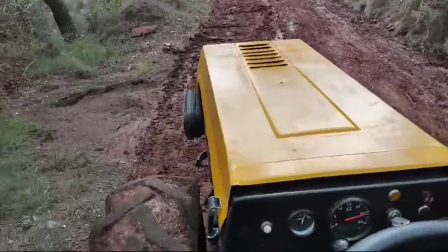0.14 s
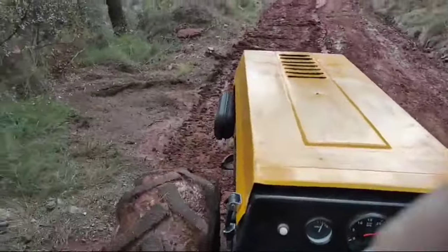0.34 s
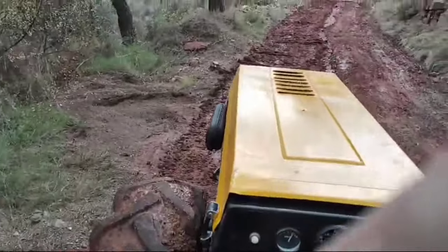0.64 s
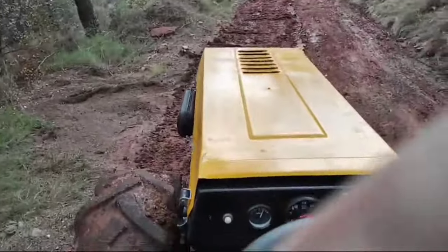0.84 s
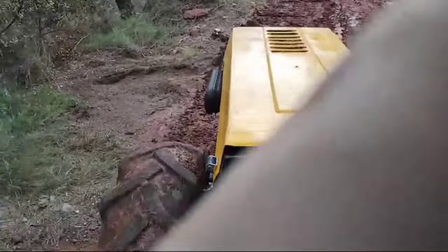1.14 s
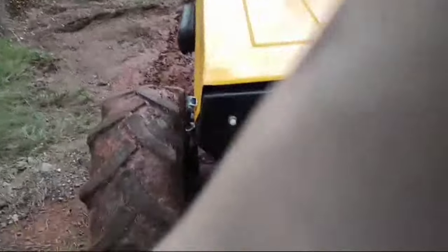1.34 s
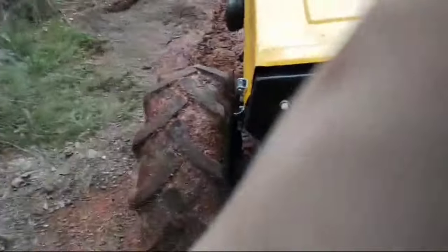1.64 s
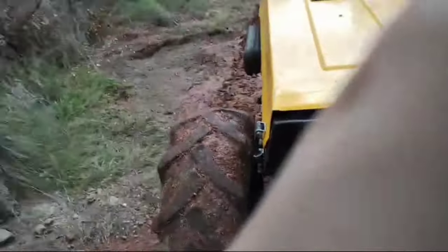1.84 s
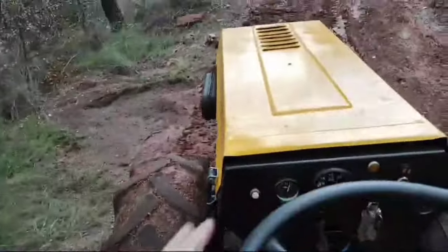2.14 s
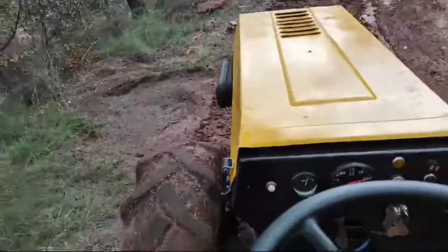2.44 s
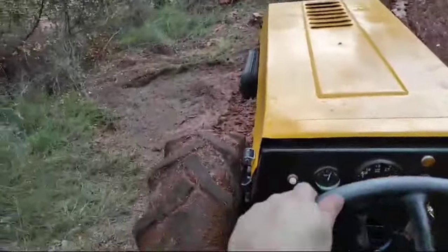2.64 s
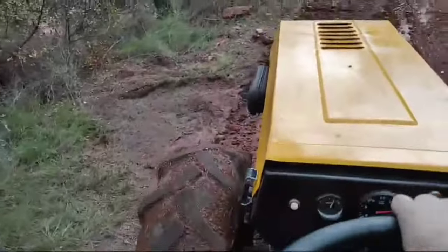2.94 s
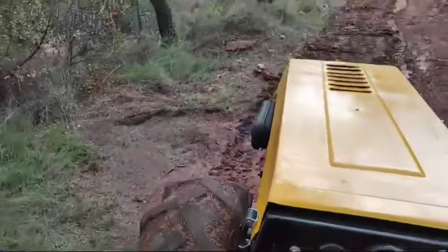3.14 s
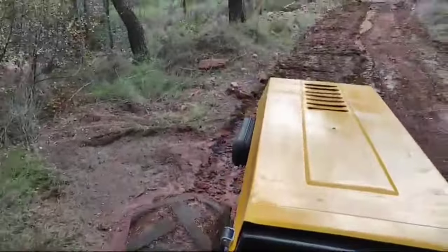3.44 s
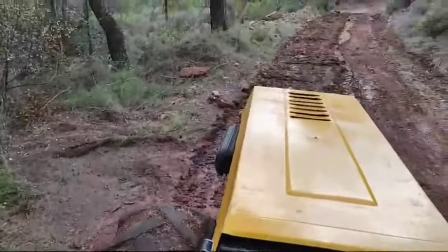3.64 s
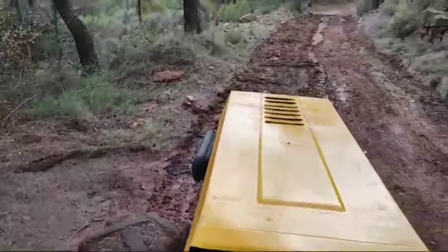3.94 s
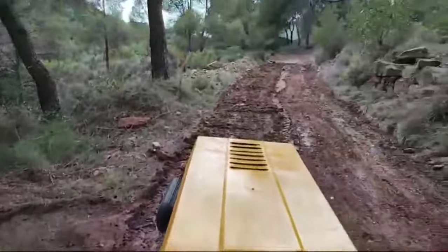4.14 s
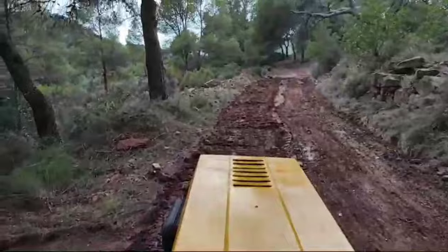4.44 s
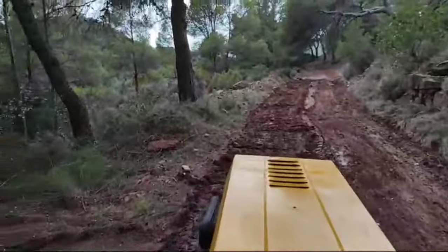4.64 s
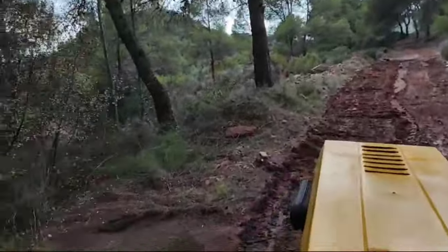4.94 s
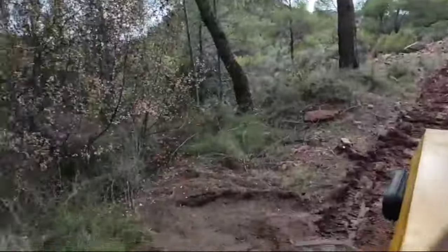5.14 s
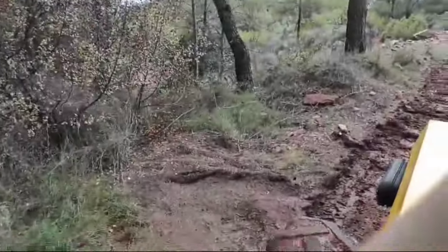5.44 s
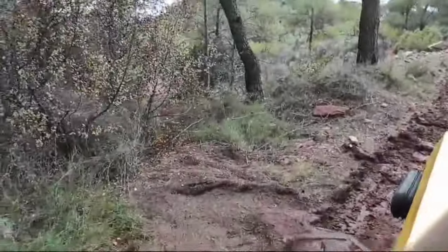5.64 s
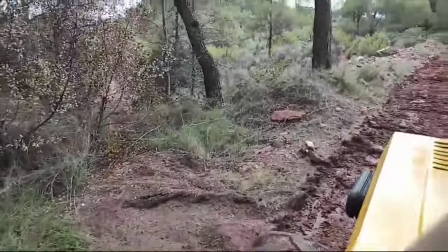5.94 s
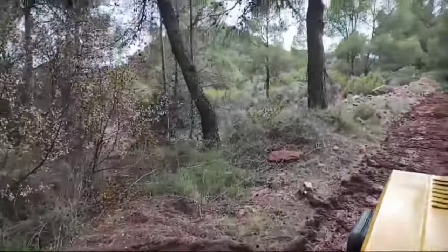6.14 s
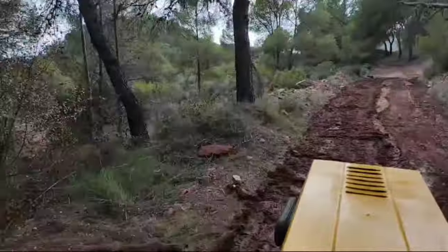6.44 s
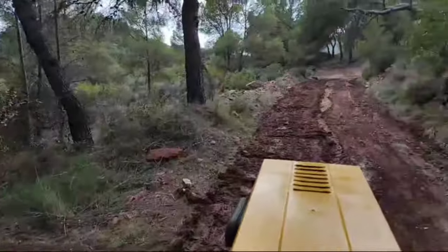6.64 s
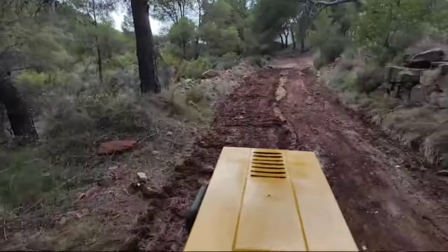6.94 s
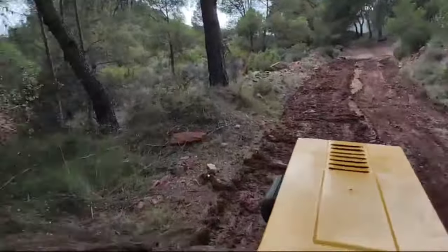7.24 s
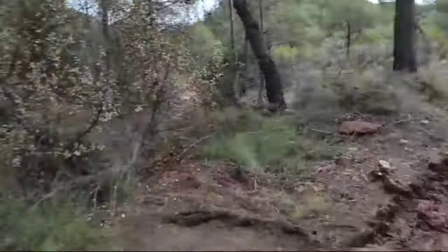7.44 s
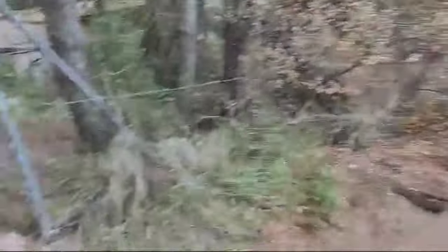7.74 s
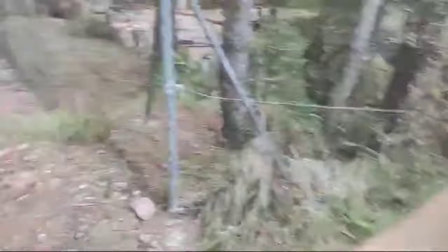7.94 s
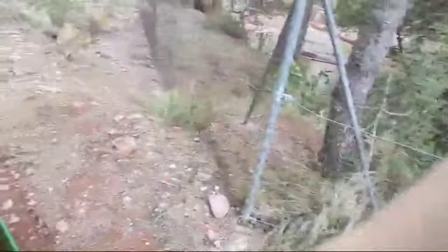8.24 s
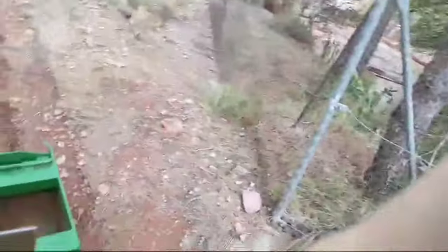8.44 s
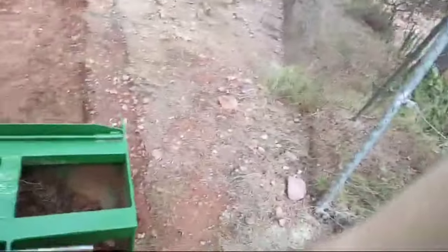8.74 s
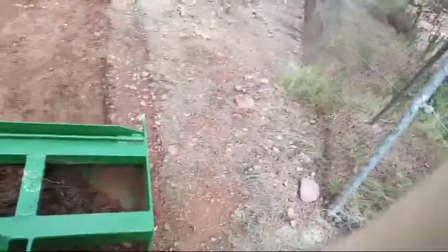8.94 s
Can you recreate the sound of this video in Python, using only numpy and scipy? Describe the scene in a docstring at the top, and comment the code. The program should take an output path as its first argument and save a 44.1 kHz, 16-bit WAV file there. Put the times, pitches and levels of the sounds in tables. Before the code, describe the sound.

Heard from the seat, a diesel tractor engine chugs and clatters at constant speed while loose panels buzz and the bodywork booms over ruts.

```python
"""A small diesel tractor pulls an implement along a dirt track at governed speed, heard from the seat.
From the start the chassis rumbles and booms over ruts, and each engine cycle repeats the same exhaust
puffs, frame throb, knocks in block and bonnet, and bright valve clatter. From 1.5 s the handheld
microphone faces the open engine bay and the clatter grows; loose sheets buzz in turn. Near 5.7 s it
glances left and comes back; from 7.4 s it swings to the rear while the engine speed sags a little."""
import sys
import numpy as np
from scipy import signal
from scipy.fft import rfft, irfft, next_fast_len
from scipy.io import wavfile
from scipy.ndimage import uniform_filter1d, minimum_filter1d

SR = 44100
rng = np.random.default_rng(int(sys.argv[2]) if len(sys.argv) > 2 else 0)


def generate_wav(sig):
    """Save sig (samples, or channels by samples) to the path in sys.argv[1] as 16-bit PCM at SR."""
    pcm = np.round(np.clip(np.atleast_2d(sig).T, -1, 1) * 32767).astype(np.int16)
    wavfile.write(sys.argv[1], SR, pcm)


N = 400869
FFT_SIZE = next_fast_len(N, True)
TIME_S = np.arange(N) / SR
FREQ_HZ = np.maximum(np.fft.rfftfreq(FFT_SIZE, 1 / SR), 1)
WANDER_S = .00016  # slow timing stray of knocks

# microphone aim: (time [s], angle from ahead [deg])
HEADING = [(5.0, 30), (5.7, 42), (6.5, 2), (7.35, 4), (7.75, 87), (8.05, 117), (8.5, 157), (9.09, 158)]
# exposure to the engine bay: (time [s], openness [0-1])
OPEN_BAY = [(1.45, 0.15), (1.6, 0.34), (1.72, 0.64), (2.4, 0.8), (5.0, 1), (5.72, 0.97), (5.88, 0.7)]
# by layer: (base [dB], drift [dB/s], bay open [dB], side on [dB], rear [dB])
AIM_LEVELS = dict(exhaust=(-14.5, 0.3238, -3, 1.1, -6), clatter=(-24.5, -0.61, 5.5, -1.5, 1),
              hiss=(-28, -0.19, 1, 1, 2.5), sizzle=(-28.5, 0.04, 4.5, 3.5, -1.2))
# left minus right by layer, same columns
AIM_PANS = dict(exhaust=(5, 0.57, -5, 0.5, 2.5), clatter=(-2.5, -0.78, 8, 0, 1),
            sizzle=(-12, 1, 7.5, 12.5, -2))
# chassis level, same columns
AIM_RUMBLE = (-21, -.03, -2, -1.5, -4)
# microphone ports: (frequency [Hz], left minus right [dB])
PORT_BALANCE = [(60, 6.5), (200, 4.2), (400, 3), (620, 2.1), (850, 5.8), (1100, 7.3), (2400, 6), (3600, 1),
                (5200, -.5), (6700, -3), (9000, 1.4)]
# microphone ports: (frequency [Hz], coherence [0-1])
PORT_COHERENCE = [(150, 1), (300, 0.93), (500, 0.79), (800, 0.6), (1400, .15), (2500, .01)]
# chassis: (frequency [Hz], relative level [dB])
RUMBLE_SPECTRUM = [(20, -28), (60, -16), (110, -15), (160, -9), (230, -4), (320, 0), (425, 0), (470, -8),
                   (530, -15), (800, -60)]
# wheel drops: (peak time [s], level [dB])
RUTS = [(.053, -20), (.334, -15), (.4, -20), (.533, -15), (.61, -19), (.878, -13), (.98, -22), (1.749, -21),
        (1.91, -19), (2.093, -20), (2.407, -16), (2.674, -18), (3.54, -20), (3.645, -18), (4.069, -21),
        (6.7, -22), (6.816, -20), (7.05, -22), (7.56, -23)]
# governed crankshaft: (time [s], speed [rpm])
CRANK_SPEED = [(0, 1783.5), (1.2, 1775.1), (3.6, 1772.1), (5.5, 1781), (7, 1775.4), (9.09, 1755.2)]
# gear and casing tones: (cycle harmonic, centre [s], half length [s], level [dB])
GEAR_TONES = [(40, 6.2, 2.4, -34), (48, 3.8, 1.5, -37), (58, 1.6, 2, -34.5), (72, 6, 1.6, -37),
              (88, 8.2, .4, -34)]
# loose sheets: (centre [s], half length [s], frequency [Hz], width [Hz], level [dB],
# phase [cycles], pulsing depth [dB])
LOOSE_SHEETS = [(0.106, 0.51, 780, 220, -23, 0.85, 1), (1.397, 0.48, 419, 60, -24, 0, 3),
                (1.4, 1.4, 944, 130, -32.5, 0.85, 3.5), (2.8, .55, 362, 100, -29.5, 0.2, 1),
                (4.25, 0.93, 623, 110, -25.5, 0.4, 3), (3.887, 1, 1143, 129, -30, .8, 0),
                (6.8, 1.03, 1037, 170, -27.5, 0.72, -3), (8.287, 0.29, 411, 49.2, -27.5, 0.6, -0.5),
                (8.5, 0.76, 834, 89.9, -30.5, 0.8, 1), (8.6, 1.2, 588, 272, -25.5, 0.5, 2)]
# bonnet sheets: (centre [s], half length [s], frequency [Hz], width [Hz], level [dB], phase [cycles])
STRUCK_SHEETS = [(1.5, 1.2, 843, 100, -31.5, .81), (6.695, 0.59, 1050, 120, -30.5, 0.69)]
# valve gear and injection: (phase [cycles], decay [cycles], relative level [dB])
BLOWS = [(.01, 0.17, -28), (.44, 0.057, 6), (.52, 0.23, 6.5), (.69, 0.25, 6.5), (.815, 0.08, -8),
         (.91, 0.49, 8)]
# sizzle: (frequency [Hz], relative left [dB], relative right [dB])
SIZZLE_SPECTRUM = [(5200, -24, -18), (6400, -22, -13.5), (7280, -1, 0), (7970, 0.5, -3.5), (8340, 7, -8),
                   (9190, 1, -10), (9570, -6.5, -30), (10370, -23.5, -45), (10730, -16.5, -33),
                   (12600, -30, -33.5)]
# sizzle flares and dips: (centre [s], half length [s], gain [dB])
SIZZLE_SWELLS = [(1.35, 0.12, -3.5), (2.536, 0.019, 5), (2.685, 0.028, 3), (5.396, 0.42, -3)]
# valve clatter: (frequency [Hz], relative level [dB])
CLATTER_SPECTRUM = [(700, -3.5), (1200, 5), (1450, -0.5), (1600, -1), (1900, -1), (2600, -5), (3300, -12),
                    (4500, -74)]
# hiss: (frequency [Hz], relative level [dB])
HISS_SPECTRUM = [(2500, -0.5), (3500, -1), (4200, -2.5), (4700, 1), (5300, -1), (6500, 1), (9000, -2.5),
                 (10200, -55), (12000, -23), (15500, -31)]
# bonnet and block modes: (frequency [Hz], width [Hz], level [dB], drift [dB/s], rear [dB])
PANEL_MODES = [(610, 240, -30, 0.36, -2), (844, 144, -26, -0.89, 3), (1030, 320, -29, 0, -6.5),
               (1285, 340, -37, 0, 5), (1850, 590, -40, -1.04, -1)]
# loud and dead spots the microphone passes: (centre [s], half length [s], near mode [Hz], gain [dB])
MODE_SPOTS = [(0, 0.31, 1032, -9), (.35, 0.15, 850, 2), (1.85, .22, 1299, 5.5), (2.243, 0.41, 850, 3),
              (4.3, 0.58, 1299, -2.5), (4.4, 0.41, 597, -3.5), (3.7, 3.7, 1850, 10), (6.797, 1.3, 1032, 4),
              (7.746, 0.11, 1032, -22), (7.698, 0.14, 1299, -11), (8.2, 0.52, 1299, 4.5)]
# knocks, one list per mode: (phase [cycles], relative level [dB], bay open [dB], rear [dB])
KNOCKS = [
    [(.0482, -4, 2, 1), (.1934, -2, 1, -1), (.5224, 0, 1, -4), (.65, 0, 0, 2), (.7471, -3, 1, 2),
     (.8777, 1, 0, -4)],
    [(.0225, -3, 1, 0), (.3651, -11, -1, 4), (.6438, -5, 3, 2), (.802, 0, -1, 0)],
    [(.4831, 0, -6, -2), (.5582, 0, -3, 1), (.6079, 0, 0, -3), (.7037, 1, 1, -5), (.8194, 0, 2, 2),
     (.8858, -1, -2, 2)],
    [(.4447, -2, 0, 3), (.5544, -3, 0, -3), (.6941, 0, 0, 2), (.8079, -2, 0, -3)],
    [(.09, -4, 2, 0), (.24, -6, 3, 0), (.45, 0, 0, 0), (.53, 0, 0, 0), (.71, 0, 0, 0), (.92, -2, 1, 0)],
]
# frame throb: (cycle harmonic, relative level [dB])
THROB_HARMONICS = [(1, -10), (2, -11), (3, -2), (4, -4), (5, 0), (6, -5), (7, -1), (8, -6), (9, -9)]
# engine on its mounts: (phase [cycles], weight [dB])
MOUNT_JOLTS = [(.02, 0), (.24, -3.5), (.79, -1)]
# exhaust tone: (cycle harmonic, relative level [dB])
EXHAUST_HARMONICS = [(10, -19), (11, -12), (12, -8.5), (13, -15), (14, -4.5), (15, 3.3), (16, -3.5),
                     (17, -5.5), (18, -7.5), (19, -1.3), (20, -9), (21, -11), (22, -11), (23, -13),
                     (24, -12), (25, -12), (26, -20), (27, -14), (28, -10), (29, -18), (30, -17)]
# gas puffs: (phase [cycles], weight [dB])
EXHAUST_PUFFS = [(.052, -2.4), (.265, -1.1), (.315, 2.9), (.532, -.6), (.645, -.2), (.765, .9)]


def undb(db):
    """Decibels to gain."""
    return 10 ** (np.asarray(db) / 20)


def over_time(table):
    """(time, value) rows, interpolated per sample."""
    return np.interp(TIME_S, *np.transpose(table))


def over_freq(table):
    """(frequency, value) rows, interpolated in log frequency."""
    hz, value = np.transpose(table)
    return np.interp(np.log(FREQ_HZ), np.log(hz), value)


def filtered(x, response):
    """Apply a frequency response."""
    return irfft(rfft(x, FFT_SIZE) * response, FFT_SIZE)[..., :N]


def resonance(at_hz, hz, width_hz):
    """Complex response of one damped mode."""
    return 1 / (1 + 1j * (at_hz ** 2 - hz ** 2) / (at_hz * width_hz))


def walk(rate_hz):
    """Smooth random drift, spread roughly 1."""
    knots = rng.standard_normal(256)
    return 1.82 * uniform_filter1d(np.interp(TIME_S * rate_hz, np.arange(256), knots), int(SR / rate_hz))


def swell(centre_s, half_s):
    """Gaussian rise and fall."""
    return np.exp(-np.minimum(((TIME_S - centre_s) / half_s) ** 2, 40))


def pan(left_db):
    """Stereo gains, mean 1, from left minus right."""
    gains = undb(np.vstack([left_db, -left_db]) / 2)
    return gains / gains.mean(axis=0)


def aimed_db(base_db, drift_db_per_s, open_db, side_db, rear_db):
    """Level as the microphone drifts, faces the bay and turns."""
    heading_rad = np.radians(over_time(HEADING))
    turn_db = side_db * np.sin(heading_rad) + rear_db * np.sin(heading_rad / 2) ** 2
    return base_db + drift_db_per_s * TIME_S + open_db * over_time(OPEN_BAY) + turn_db


def at_ports(pair, response):
    """Filter two signals into left and right, coherent in the bass; unit RMS in the middle."""
    coherence = np.clip(over_freq(PORT_COHERENCE), 0, 1)
    tilt = undb(over_freq(PORT_BALANCE) / 2)
    response = response / np.sqrt(tilt ** 2 + tilt ** -2 + 2 * coherence)
    left = filtered(pair[0], response * tilt)
    right = filtered(pair[0], response * coherence / tilt)
    right += filtered(pair[1], response * np.sqrt(1 - coherence ** 2) / tilt)
    return np.array([left, right]) / np.std((left + right) / 2)


def ring_mode(pair, hz, width_hz):
    """A metal mode, driven by two signals, at the ports."""
    return at_ports(pair, resonance(FREQ_HZ, hz, width_hz) ** 2)


def with_far_port(pushes, hz):
    """Pair pushes with a copy a quarter period late, for the far port."""
    return np.array([pushes, np.roll(pushes, int(SR / hz / 4))])


def rattle(cycle, repeat_share, count=5, size=2980):
    """Noise pair; a share repeats each cycle, its pattern morphing as the microphone moves."""
    patterns = rng.standard_normal((count, 2, size))
    place = (cycle % 1 * size).astype(int)
    stage = TIME_S / TIME_S[-1] * (count - 1)
    step = np.minimum(stage.astype(int), count - 2)
    blend_rad = np.pi / 2 * (stage - step)
    repeating = patterns[step, :, place].T * np.cos(blend_rad)
    repeating += patterns[step + 1, :, place].T * np.sin(blend_rad)
    return np.sqrt(repeat_share) * repeating + np.sqrt(1 - repeat_share) * rng.standard_normal((2, N))


def chassis_rumble(cycle, chug_db=-0.5, uneven_db=1.2):
    """The uneven track shakes the chassis; the level pulses each cycle and has one lull."""
    level_db = aimed_db(*AIM_RUMBLE) + uneven_db * walk(2.69) + chug_db * np.cos(2 * np.pi * cycle)
    lull_db = -3.5 * swell(centre_s=4.4, half_s=0.9)
    shake = at_ports(rng.standard_normal((2, N)), undb(over_freq(RUMBLE_SPECTRUM)))
    return undb(level_db + lull_db) * shake


def rut_booms(boom_hz=152, rise_s=.013):
    """Each rut thumps the bodywork, which booms briefly."""
    out, size = np.zeros(N), int(12 * rise_s * SR)
    age = np.arange(size) / SR / rise_s
    for peak_s, db in RUTS:
        start = int((peak_s - rise_s) * SR)
        tone = np.sin(2 * np.pi * (boom_hz * rise_s * age + rng.random()))
        out[start:start + size] += undb(db) * age * np.exp(1 - age) * tone
    return pan(left_db=4) * out


def gear_whine(cycle, waver_db=2.5):
    """Tones locked to the crankshaft waver, swell and fade."""
    out = 0
    for harmonic, centre_s, half_s, db in GEAR_TONES:
        phase_rad = 2 * np.pi * (harmonic * cycle + rng.random()) + 0.15 * walk(5.5)
        envelope = np.sqrt(2) * undb(db + waver_db * walk(2.96)) * swell(centre_s, half_s)
        out += envelope * np.cos([phase_rad, phase_rad + 0.33 * walk(0.59)])
    return pan(left_db=5) * out


def sheet_buzz(cycle):
    """Loose sheet metal buzzes for a while, pulsing with the cycle."""
    out = 0
    for centre_s, half_s, hz, width_hz, db, phase, depth_db in LOOSE_SHEETS:
        force = undb(depth_db * np.cos(2 * np.pi * (cycle - phase)))
        buzz = ring_mode(force * rattle(cycle, repeat_share=.6), hz, width_hz)
        running_rms = np.sqrt(uniform_filter1d(buzz.mean(axis=0) ** 2, size=SR // 5))
        out += undb(db) * swell(centre_s, half_s) * buzz / running_rms
    return out


def sheet_rings(cycle, scatter_db=1.5):
    """One heavy knock per cycle rings a bonnet sheet, heard while the microphone is near."""
    out = 0
    for centre_s, half_s, hz, width_hz, db, phase in STRUCK_SHEETS:
        hits = np.flatnonzero(np.diff(np.floor(cycle - phase)))
        stray, softer = rng.standard_normal((256, 2))[:len(hits)].T
        hits += (WANDER_S * SR * stray).astype(int)
        pushes = np.zeros(N)
        pushes[np.clip(hits, 0, N - 1)] = undb(-scatter_db * softer)
        out += undb(db) * swell(centre_s, half_s) * ring_mode(with_far_port(pushes, hz), hz, width_hz)
    return out


def blow_envelope(cycle, floor_db, scatter_db=1.5):
    """Valve and injection blows: fast rise, exponential decay, uneven strength."""
    power = undb(floor_db) ** 2
    for phase, decay_cycles, db in BLOWS:
        elapsed = cycle - phase + 2
        strengths = undb(db + scatter_db * rng.standard_normal(256))
        power += (strengths[elapsed.astype(int)] * np.exp(-(elapsed % 1) / decay_cycles)) ** 2
    return np.sqrt(uniform_filter1d(power, size=140))


def sizzle(cycle):
    """The blows set off a fine metallic sizzle, coloured differently at each port."""
    bursts = blow_envelope(cycle, floor_db=-10) * rng.standard_normal((2, N))
    spectra_db = [over_freq(np.array(SIZZLE_SPECTRUM)[:, [0, port]]) for port in (1, 2)]
    pair = filtered(bursts, undb(spectra_db))
    pair /= pair.std(axis=1, keepdims=True)
    level_db = aimed_db(*AIM_LEVELS["sizzle"])
    level_db += sum(db * swell(centre_s, half_s) for centre_s, half_s, db in SIZZLE_SWELLS)
    return undb(level_db) * pan(aimed_db(*AIM_PANS["sizzle"])) * pair


def valve_clatter(cycle, grain_db=1.0, grain_samples=50):
    """Valve gear and injection clatter in grainy bursts, with a pulsing hiss above."""
    force = blow_envelope(cycle, floor_db=2)
    grain = undb(-grain_db * rng.standard_normal(N // grain_samples + 1))
    bursts = force * np.repeat(grain, grain_samples)[:N] * rattle(cycle, repeat_share=0.42)
    clatter = at_ports(bursts, undb(over_freq(CLATTER_SPECTRUM)))
    clatter *= undb(aimed_db(*AIM_LEVELS["clatter"])) * pan(aimed_db(*AIM_PANS["clatter"]))
    hiss = at_ports(force * rng.standard_normal((2, N)), undb(over_freq(HISS_SPECTRUM)))
    return clatter + undb(aimed_db(*AIM_LEVELS["hiss"])) * hiss


def panel_levels_db():
    """Each mode's level follows the aim and the loud and dead spots."""
    levels_db = [aimed_db(db, drift, 0, 0, rear_db) for _, _, db, drift, rear_db in PANEL_MODES]
    for centre_s, half_s, hz, db in MODE_SPOTS:
        nearest = np.argmin([abs(hz - mode[0]) for mode in PANEL_MODES])
        levels_db[nearest] += db * swell(centre_s, half_s)
    return levels_db


def knock_pushes(cycle, knocks, jitter_s=.00009, scatter_db=.6):
    """Impulses near set crank angles, varying in timing and strength."""
    pushes, cycles = np.zeros(N), np.arange(int(cycle[-1]) + 1)
    bay, rear = over_time(OPEN_BAY), aimed_db(0, 0, 0, 0, rear_db=1)
    for phase, db, open_db, rear_db in knocks:
        wander, jitter, harder = rng.standard_normal((256, 3))[cycles].T
        wander = uniform_filter1d(wander, size=13)
        stray_s = WANDER_S * wander / wander.std() + jitter_s * jitter
        hits = (np.interp(cycles + phase, cycle, TIME_S, right=np.inf) + stray_s) * SR
        inside = (hits >= 0) & (hits < N)
        hits = hits[inside].astype(int)
        pushes[hits] += undb(db + open_db * bay[hits] + rear_db * rear[hits] + scatter_db * harder[inside])
    return pushes


def panel_knocks(cycle, shiver_db=-3, shiver_decay_s=.015):
    """Combustion and piston knocks ring bonnet and block and leave them shivering."""
    out, fade = 0, np.exp(-2 / (shiver_decay_s * SR))
    for (hz, width_hz, *_), knocks, level_db in zip(PANEL_MODES, KNOCKS, panel_levels_db()):
        pushes = knock_pushes(cycle, knocks)
        shiver_power = signal.lfilter([1 - fade], [1, -fade], pushes ** 2 + 1e-18)
        shiver = undb(shiver_db) * np.sqrt(shiver_power) * rattle(cycle, repeat_share=0.23)
        out += undb(level_db) * ring_mode(with_far_port(pushes, hz) + shiver, hz, width_hz)
    return out


def pulse_tone(cycle, cycle_hz, harmonics, pulses, mode_hz, width_hz, waver):
    """Cycle harmonics, phased as uneven pulses through a resonance; firing strength wavers."""
    out = 0
    for k, db in harmonics:
        drive = sum(undb(weight_db) * np.exp(-2j * np.pi * k * phase) for phase, weight_db in pulses)
        shift_rad = np.angle(drive * resonance(k * cycle_hz, mode_hz, width_hz))
        out += undb(db) * np.cos(2 * np.pi * k * cycle + shift_rad)
    return (1 + waver * walk(25)) * out / out.std()


def frame_throb(cycle, cycle_hz, level_db=-27.5):
    """The engine jolts the frame through its mounts; independent of the aim."""
    tone = pulse_tone(cycle, cycle_hz, THROB_HARMONICS, MOUNT_JOLTS, mode_hz=63, width_hz=31, waver=.052)
    return undb(level_db) * pan(left_db=6.8) * tone


def exhaust(cycle, cycle_hz):
    """Gas puffs ring the silencer."""
    tone = pulse_tone(cycle, cycle_hz, EXHAUST_HARMONICS, EXHAUST_PUFFS,
                      mode_hz=215, width_hz=60, waver=.048)
    return undb(aimed_db(*AIM_LEVELS["exhaust"])) * pan(aimed_db(*AIM_PANS["exhaust"])) * tone


def scene():
    """One engine cycle, two crank turns, clocks all layers but the ruts."""
    cycle_hz = over_time(CRANK_SPEED) / 120
    cycle = np.cumsum(cycle_hz) / SR
    bass = exhaust(cycle, cycle_hz.mean()) + frame_throb(cycle, cycle_hz.mean())
    metal = panel_knocks(cycle) + sheet_rings(cycle) + sheet_buzz(cycle) + gear_whine(cycle)
    treble = valve_clatter(cycle) + sizzle(cycle)
    return bass + metal + treble + chassis_rumble(cycle) + rut_booms()


def record(dry, ceiling=.98, cutoff_hz=15200):
    """Smooth peak limiter, then a steep low-pass."""
    max_gain = np.minimum(1, ceiling / (np.abs(dry) + 1e-9))
    gain = uniform_filter1d(minimum_filter1d(max_gain, size=129), size=129)
    return signal.sosfilt(signal.ellip(10, .1, 80, cutoff_hz, fs=SR, output="sos"), dry * gain)


dry = scene()
out = record(dry)
generate_wav(out)
```